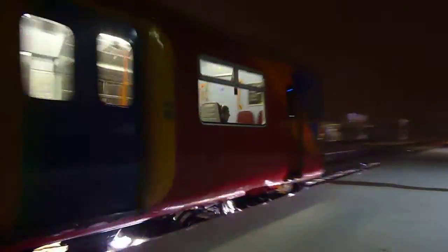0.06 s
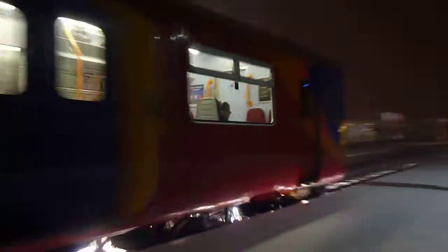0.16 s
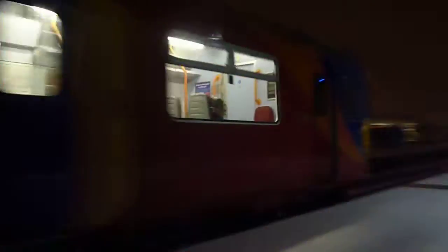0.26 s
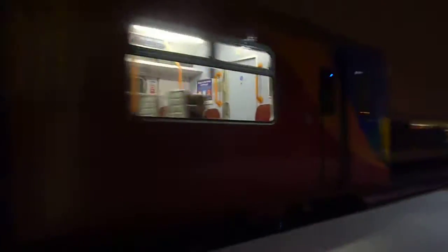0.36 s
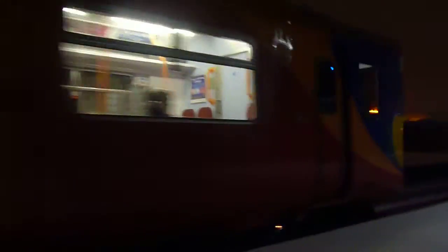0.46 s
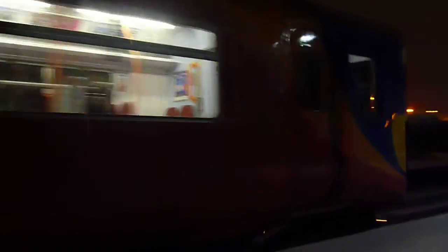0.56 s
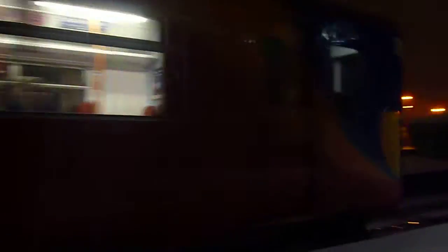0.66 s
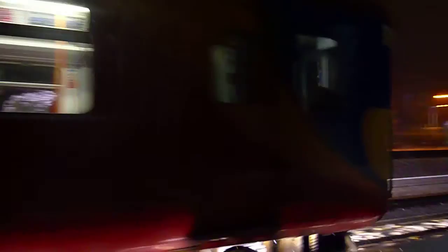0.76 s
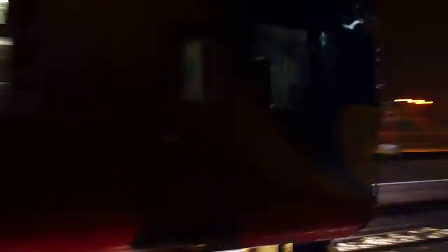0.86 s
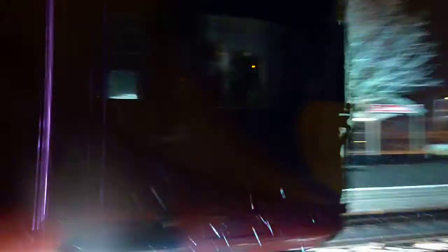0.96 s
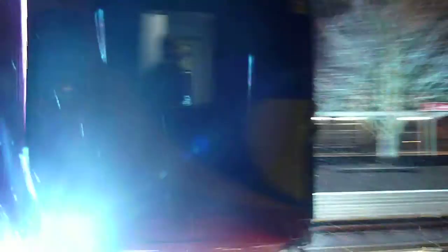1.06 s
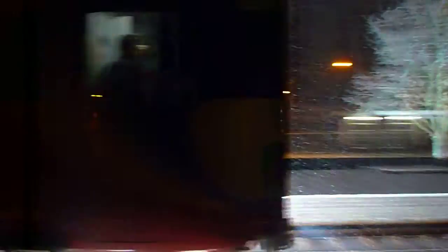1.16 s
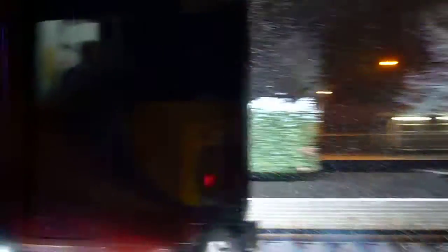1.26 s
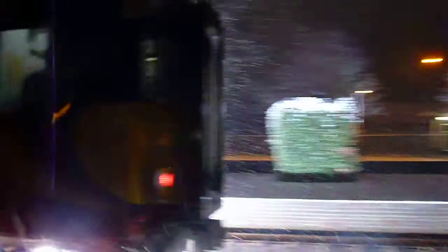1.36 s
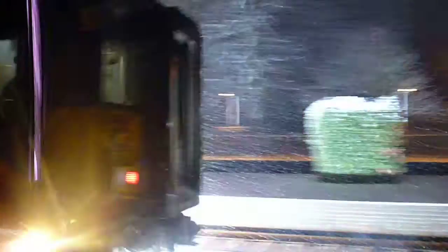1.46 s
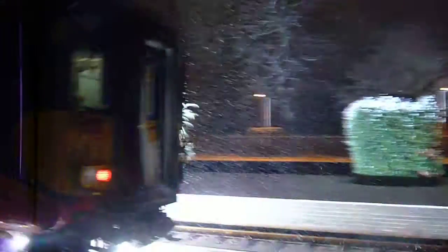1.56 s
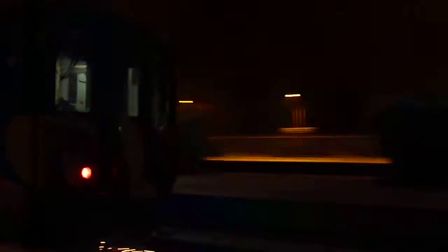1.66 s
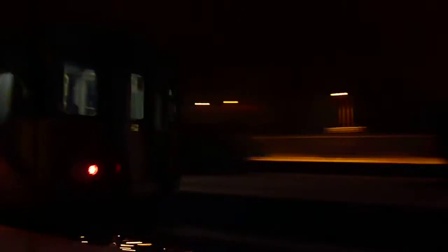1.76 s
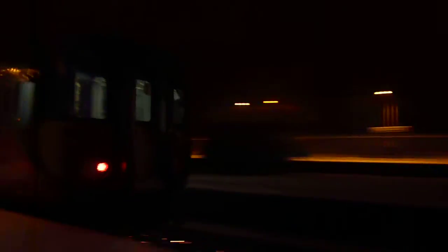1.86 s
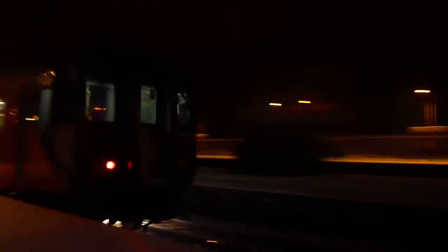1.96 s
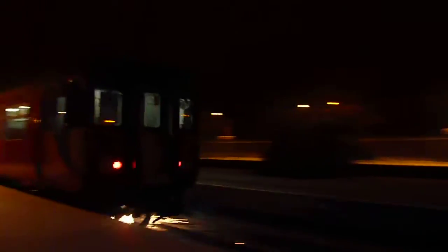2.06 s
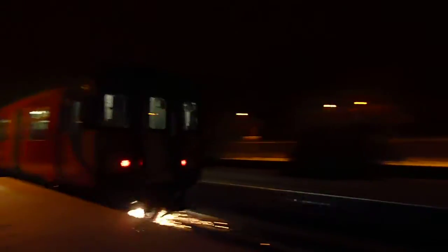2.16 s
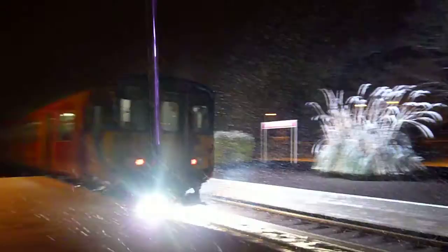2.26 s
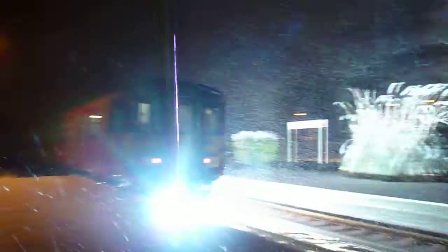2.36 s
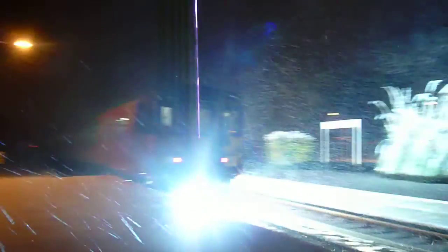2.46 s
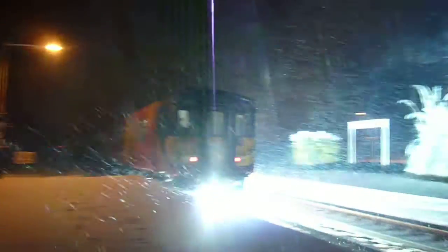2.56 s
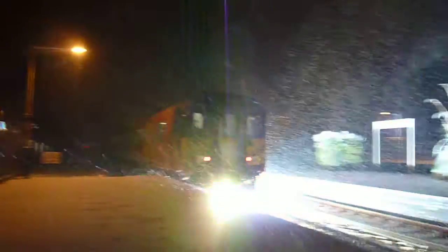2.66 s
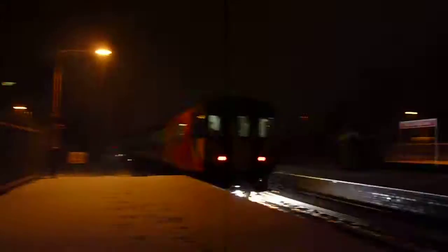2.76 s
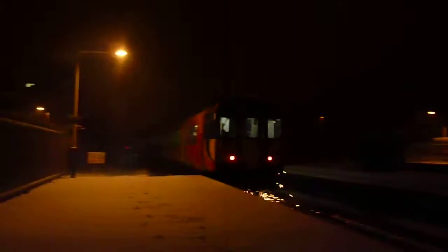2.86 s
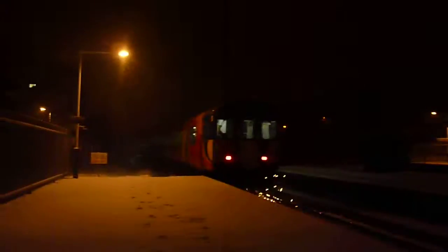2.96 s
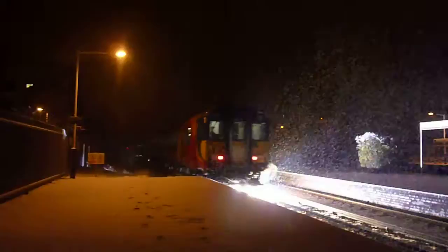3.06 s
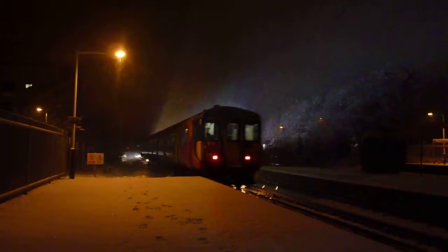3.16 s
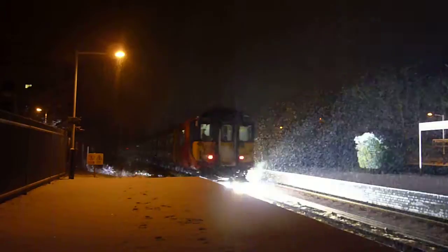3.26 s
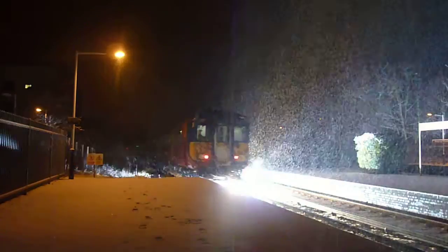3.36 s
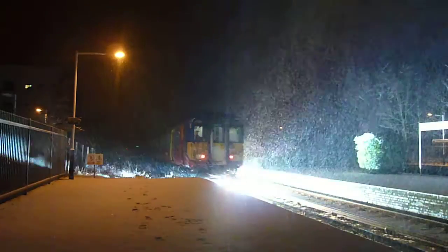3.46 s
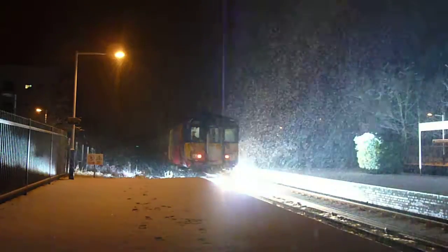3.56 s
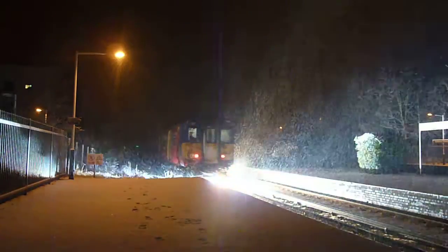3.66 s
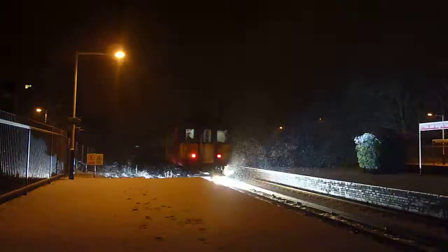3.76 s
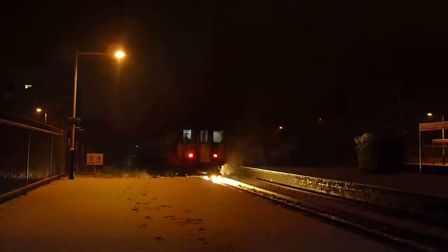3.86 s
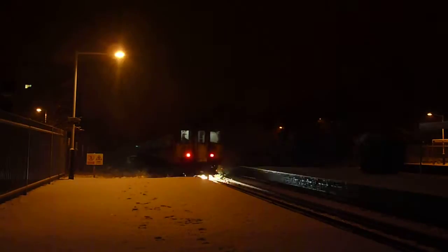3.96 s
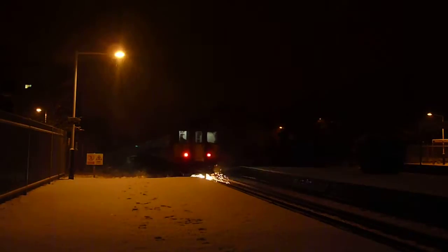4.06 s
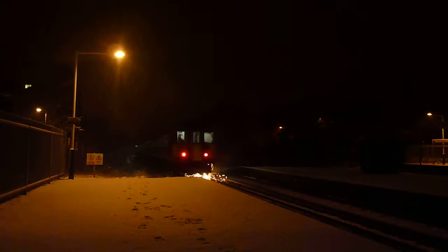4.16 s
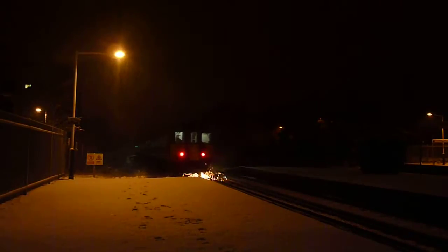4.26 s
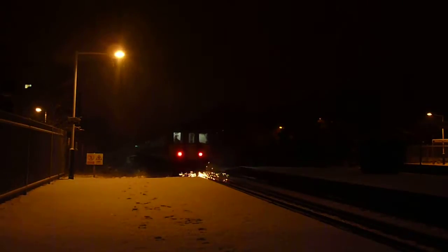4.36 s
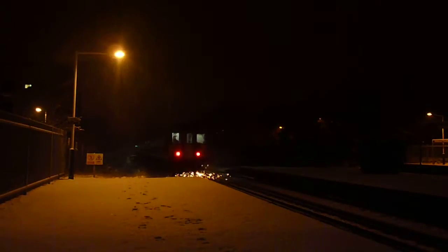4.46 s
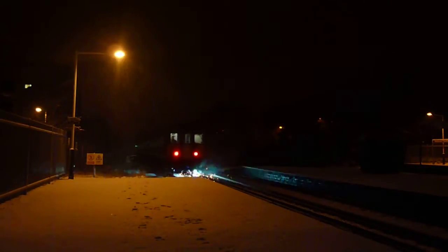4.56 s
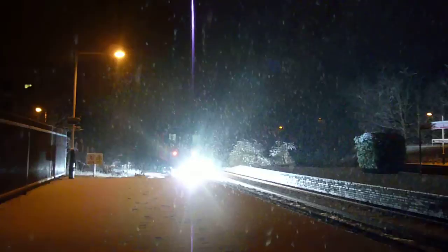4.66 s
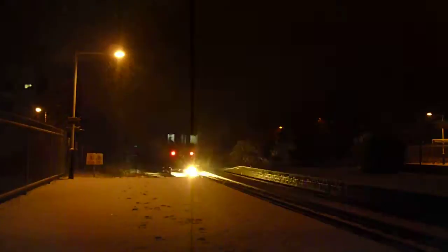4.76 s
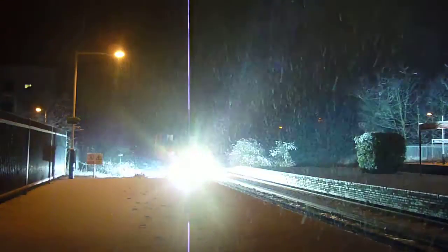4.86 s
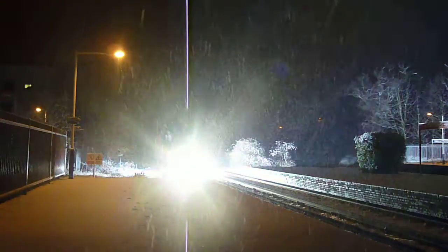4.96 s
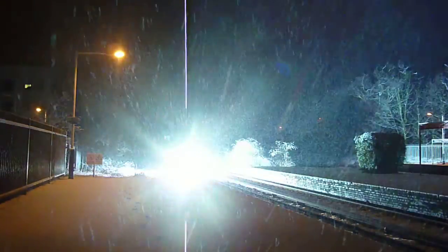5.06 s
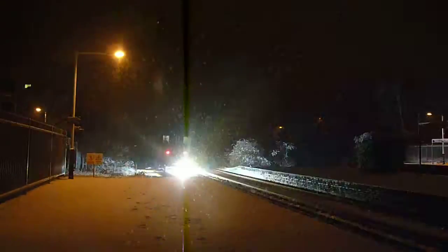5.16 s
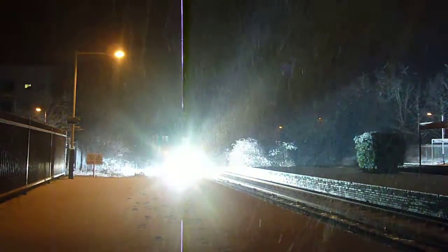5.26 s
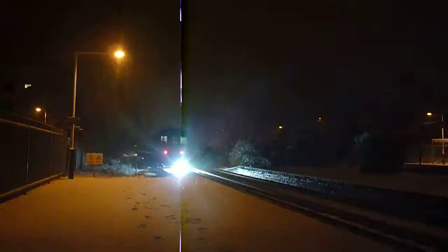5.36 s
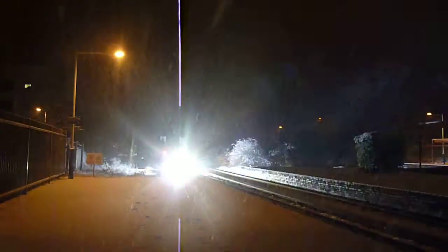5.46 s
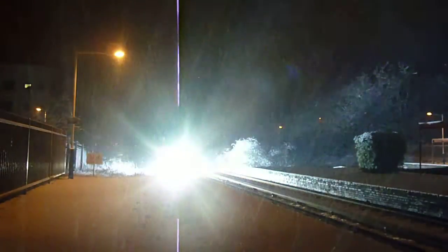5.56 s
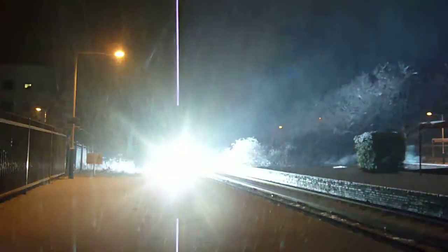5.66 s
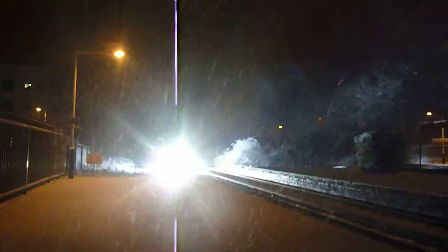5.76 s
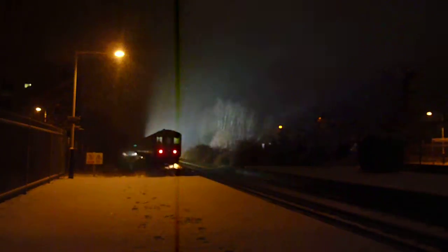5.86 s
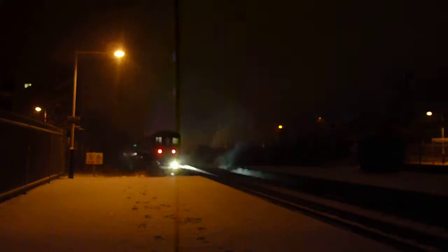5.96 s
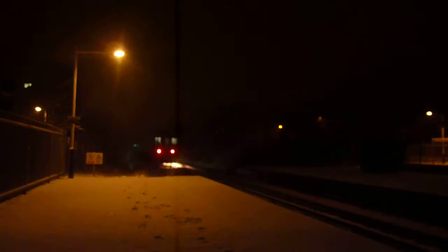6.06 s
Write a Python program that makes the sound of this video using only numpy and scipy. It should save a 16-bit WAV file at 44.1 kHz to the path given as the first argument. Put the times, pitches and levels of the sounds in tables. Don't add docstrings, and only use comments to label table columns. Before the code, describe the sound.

A train rolls away with a low, patchy rumble and wheel hiss throughout, quieter than the arcs. At 0 to 0.2 s brief arcs spit and crackle; from 0.3 to 0.7 a rough hollow howl near 480 Hz moves under the car. A sharp double burst and heavy knock come at 0.71 to 0.8, then a fierce buzzing arc passes closest at 0.85 to 1.3, surging again until 1.65. After a lull, snaps and a weak burst fill 1.94 to 2.1; a long ringing, crackling roar holds from 2.2 to 2.77. Mostly rolling follows, then a hard strike at 3.11, a duller booming arc from 3.33 to 3.83, and another fading by 4.2. Faint knocks and rolling lead to a violent crack at 4.76. From 4.88 far, thin arcs fizz and restrike near 5.3 and 5.6, ending about 6.09. Short outdoor echoes, small microphone, limited treble.

```python
import sys
import numpy as np
from scipy import signal
from scipy.io import wavfile
from scipy.ndimage import uniform_filter1d

SR = 44100
rng = np.random.default_rng(int(sys.argv[2]) if len(sys.argv) > 2 else 0)


def invert_db(x):
    u = np.asarray(x, float) / 20
    return 10 ** u


def unload_wav(signal):
    wavfile.write(
        sys.argv[1],
        SR,
        np.round(np.clip(np.atleast_2d(signal).T, -1, 1) * 32767).astype(np.int16),
    )


N = 268715


def evened(x):
    return x / np.sqrt(np.mean(x ** 2) + 1e-20)


def read(points, hz):
    f, value = np.transpose(points)
    return np.interp(np.log(hz + 1), np.log(f + 1), value)


def add(mix, s, sound):
    part = mix[round(s * SR):][:len(sound)]
    part += sound[:len(part)]


def colour(x, points):
    db = read(points, abs(np.fft.fftfreq(8192, 1 / SR)))
    log_gain = np.log(invert_db(np.maximum(db, -100)))
    taps = np.fft.ifft(np.exp(np.conj(signal.hilbert(log_gain)))).real[:4096]
    return signal.oaconvolve(x, taps)[:len(x)]


def band(x, lo_hz, hi_hz, order=3):
    sos = signal.butter(order, [lo_hz, hi_hz], "band", fs=SR, output="sos")
    return evened(signal.sosfilt(sos, x))


def resonate(x, hz, width):
    r = np.exp(-np.pi * width / SR)
    return evened(signal.lfilter([1], [1, -2 * r * np.cos(2 * np.pi * hz / SR), r * r], x))


def flicker(seconds):
    size = round(seconds * SR)
    smooth = uniform_filter1d(uniform_filter1d(rng.standard_normal(N), size), size)
    return np.clip(evened(smooth), -2, 2)


def sparks(per_s, spread_db, hiss):
    size = invert_db(spread_db * np.minimum(rng.exponential(1, N), 5)) * rng.choice([-1., 1.], N)
    return evened(size * (rng.random(N) < per_s / SR)) + hiss * rng.standard_normal(N)


def mottled(x, patchy_db):
    z = signal.stft(x, nperseg=1024, noverlap=768)[2]
    patches = uniform_filter1d(rng.standard_normal(z.shape), size=4, axis=0)
    patches = uniform_filter1d(patches, size=7, axis=1)
    patches = evened(uniform_filter1d(patches, size=3, axis=0))
    return signal.istft(z * invert_db(patchy_db * patches), nperseg=1024, noverlap=768)[1][:N]


# frequency in Hz, reverberation time T60 in seconds.
RETURN_DECAY = [(100, 0.7), (1000, 0.71), (3000, 0.48), (7000, 0.44)]


def surrounds(x):
    taps = np.zeros(SR)
    at = np.arange(400, SR - 20, 20)
    taps[at + rng.integers(0, 20, len(at))] = rng.choice([-1., 1.], len(at))
    hz, t, z = signal.stft(taps, SR, nperseg=256)
    decay = invert_db(-60 * t / read(RETURN_DECAY, hz)[:, None])
    tail = signal.istft(z * decay, SR, nperseg=256)[1]
    return signal.fftconvolve(x, tail / np.linalg.norm(tail))[:N]


# time in seconds, level in dB, brightness in dB.
ROLLING_LEVEL = [(0, -34, 2.5), (.26, -38, 5), (.45, -31, -1), (.68, -31.5, -6.5), (.83, -46, 9.5),
                 (1.3, -36, 4.5), (1.69, -38, 1.5), (1.92, -33.5, -6), (2.14, -39.5, 2), (2.8, -38, 3.5),
                 (3.09, -35.5, -3.5), (3.27, -43.5, 11.5), (3.84, -37, 3.5), (4.3, -38.5, -1.5),
                 (4.46, -40.5, -7), (4.6, -39, -12), (4.731, -40, -6), (6.09, -33.5, -0.5)]
# frequency in Hz, density in dB per Hz.
ROLLING_COLOUR = [(15, -29.5), (25, -13), (180, -8.5), (368, -14.5), (456, -4.5), (579, -5.5),
                  (1430, -14.5), (4490, -22.5), (7400, -36.5), (9620, -88.5), (16300, -120)]
HISS_DB, TOP_DB, TOP_PER_BRIGHT = -0.9, -14, 1.66
RUMBLE_DB, RUMBLE_PER_LEVEL, RUMBLE_SPREAD = 5, 0.43, 0.54
BOGIE_PASSES_S, TRACK_M, SPEED_M_S = 0.71, 5.4, 6.4


def rolling():
    s, *columns = np.transpose(ROLLING_LEVEL)
    t = np.arange(N) / SR
    body_db, bright_db = (np.interp(t, s, c) for c in columns)
    hiss_db = body_db + HISS_DB + bright_db
    top_db = body_db + TOP_DB + TOP_PER_BRIGHT * bright_db
    rumble_db = body_db[0] + RUMBLE_PER_LEVEL * (body_db - body_db[0]) + RUMBLE_DB
    along = SPEED_M_S * (t - BOGIE_PASSES_S) / TRACK_M
    rumble_db -= RUMBLE_SPREAD * 10 * np.log10(1 + along ** 2)

    x = mottled(sparks(per_s=5000, spread_db=0.0, hiss=1.2), patchy_db=2.1)
    x = colour(x, ROLLING_COLOUR)
    body = band(x, 620, 2550, order=2) * invert_db(body_db + 0.58 * flicker(0.064))
    hiss = band(x, 2050, 3870, order=1) * invert_db(hiss_db)
    hiss += band(x, 3160, 6800, order=2) * invert_db(top_db)
    hiss *= invert_db(flicker(0.045))
    rumble = band(x, 30, 643) * invert_db(rumble_db + 0.66 * flicker(0.067))
    rails = band(x, 540, 880, order=2) * invert_db(-45.5)
    return body + hiss + rumble + rails


# start in seconds, peak level in dB, ring in Hz, decay time T60 in seconds.
WHEEL_KNOCKS = [(0.311, -28.5, 186, 0.0095), (3.735, -24.5, 102, 0.08), (0.769, -6, 934, 0.033),
                (0.792, -12, 153, 0.041), (1.274, -10.5, 281, 0.054), (1.343, -18, 261, 0.025),
                (1.377, -24, 220, 0.043), (2.1765, -12, 585, 0.013), (2.293, -11.5, 150, 0.029),
                (3.318, -14, 414, 0.02), (4.379, -29, 762, 0.023), (4.455, -31, 678, 0.017),
                (4.545, -29, 750, .03), (4.584, -27, 805, .02), (4.604, -27, 584, 0.026),
                (4.477, -9.5, 237, 0.0055), (4.7545, -15.5, 215, 0.06)]


def knocks():
    out, t = np.zeros(N), np.arange(3000) / SR
    for s, db, hz, t60 in WHEEL_KNOCKS:
        envelope = invert_db(db + 0.5 - 60 * t / t60) * np.minimum(t / .0015, 1)
        add(out, s, envelope * np.sin(2 * np.pi * hz * t))
    return out


# time in seconds, level in dB, howl in Hz.
HIDDEN_HOWL = [
    (.3, -30, 486),
    (.338, -33, 450),
    (.376, -37, 448),
    (.456, -30, 490),
    (.604, -31, 474),
    (.638, -34, 477),
    (.67, -32, 547),
    (.72, -32.5, 490),
]
DRONE_DB, DRONE_DB_PER_S = -7.5, 23


def hidden_arc():
    s, *columns = np.transpose(HIDDEN_HOWL)
    t = np.arange(s[0], s[-1], 1 / SR)
    howl_db, hz = (np.interp(t, s, c) for c in columns)
    drone_db = howl_db + DRONE_DB + DRONE_DB_PER_S * (t - s[0])
    drive = sparks(per_s=820, spread_db=2.5, hiss=0.5)[:len(t)]
    turn = np.exp(2j * np.pi * np.cumsum(hz) / SR)
    r = np.exp(-np.pi * 220 / SR)
    ring = turn * signal.lfilter([1], [1, -2 * r, r * r], drive / turn)
    howl = invert_db(howl_db) * evened(ring.real + .002 * drive)
    drone = invert_db(drone_db) * resonate(drive, hz=210, width=33)
    out = np.zeros(N)
    add(out, s[0], (howl + drone) * signal.windows.tukey(len(t), .04))
    return out


# middle in
# seconds, peak level in dB, ring in Hz, length in ms.
HOLLOW_POPS = [(0.006, -22.5, 1278, 7.7), (0.0155, -24, 3531, 15), (0.097, -30, 1350, 15.0),
               (0.1093, -27.5, 5254, 9.0), (0.1127, -26, 4810, 16), (0.7206, -25, 2710, 6.7),
               (0.534, -28, 490, 20), (0.7772, -27.5, 2060, 14.0), (0.8518, -20, 1135, 8.9),
               (0.876, -16, 174.4, 15.0), (1.013, -26.5, 856, 15), (1.08, -26, 877, 19),
               (1.207, -23, 1470, 10), (1.3443, -13.5, 212, 6.0), (1.384, -21.5, 290, 20),
               (2.299, -17.5, 1317, 4.6), (2.307, -24, 3840, 10), (2.312, -26, 1824, 6.0),
               (2.32, -23, 4080, 8.0), (2.3382, -17, 2840, 7.0), (2.3846, -26, 2905, 8.8),
               (2.5158, -23.5, 1090, 26.0), (2.5535, -26, 2650, 11), (2.377, -26, 453, 20),
               (2.6936, -23, 1870, 7.8), (2.7238, -26, 2860, 8), (3.402, -28.5, 2142, 16),
               (3.1498, -24, 3660, 14.0), (3.153, -22, 3224, 18), (3.1885, -25, 1498, 11),
               (3.331, -28, 1513, 6.6), (3.342, -25, 2246, 22), (3.3332, -25, 4060, 14),
               (3.342, -21, 2900, 12.0), (3.3539, -27, 3550, 8.1), (3.6404, -24, 2970, 5.7),
               (3.65, -26.5, 1033, 30), (3.6617, -20.5, 2980, 5.7), (3.6921, -17, 3360, 5.0),
               (3.7885, -23, 1610, 5), (3.8795, -23, 1410, 9.0), (3.8835, -20, 3100, 4.0),
               (4.7629, -11, 3130, 2.7), (4.757, -16.5, 3050, 2.5), (4.7688, -26, 4540, 5.7),
               (4.85, -24.5, 2820, 12.0), (4.9138, -26, 3630, 10), (4.9143, -23.5, 2910, 15),
               (5.631, -19, 3359, 3.9), (5.902, -25, 196, 26),
               (0.009, -26, 520, 11), (0.135, -24, 199, 25), (0.382, -25.5, 355, 42),
                 (0.385, -26, 457, 40), (0.478, -23.5, 498, 28), (0.865, -24, 150.5, 30),
                 (0.952, -20.5, 190, 10.8), (0.655, -27, 213, 50), (0.988, -19, 443, 9),
                 (1.005, -19, 1022, 11.1), (1.037, -26, 470, 10), (1.068, -24, 559, 24),
                 (1.1, -22, 191, 24), (5.372, -20.5, 239, 21.5), (3.55, -27.5, 95.4, 40),
                 (1.155, -22, 172, 12.7), (5.268, -29, 90.5, 25), (3.521, -28, 1440, 20),
                 (1.397, -27, 518, 19.5), (1.514, -24, 1265, 10), (1.539, -26, 1647, 14),
                 (2.307, -28, 455, 34), (2.487, -30.5, 438, 21), (2.587, -23, 191, 15),
                 (3.123, -24.5, 1460, 17), (3.124, -27.5, 1050, 11.4), (3.49, -22, 224, 35),
                 (3.575, -20, 231.3, 60), (3.61, -30, 1480, 40), (4.934, -21, 213, 12.2),
                 (5.79, -27, 234, 17)]


def pops():
    events = HOLLOW_POPS
    out, rough = np.zeros(N), rng.standard_normal((len(events), 6000))
    for (s, db, hz, ms), noise in zip(events, rough):
        t = np.arange(min(round(2 * ms * SR / 1000), 6000)) / SR
        wobble = 1 + 0.3 * evened(uniform_filter1d(noise, size=60))[:len(t)]
        tone = np.hanning(len(t)) * wobble * np.sin(2 * np.pi * hz * t)
        add(out, max(s - ms / 1000, 0), invert_db(db) * tone)
    return out


# peak time in seconds, peak level in dB, ring in Hz.
ICE_SNAPS = [(0.114, -6.5, 3830), (0.724, -11, 4310), (0.7437, -11, 4440), (0.7734, -10, 1130),
             (0.8495, -5, 900), (1.1934, -15, 2670), (1.2021, -8.5, 1890), (1.5644, -12, 3880),
             (1.5749, -7, 4500), (1.6037, -12, 2330), (1.953, -9.5, 2300), (2.0339, -16, 2800),
             (2.0489, -12, 2370), (2.0917, -18.5, 4010), (2.2109, -13, 3530), (2.2452, -21.5, 2840),
             (2.2813, -7, 3250), (2.3013, -10, 4220), (2.3089, -5.5, 2890), (2.3365, -9, 2630),
             (2.3418, -7, 2630), (2.3875, -9.5, 2710), (2.487, -12.5, 1290), (2.5236, -14, 2540),
             (2.5649, -8, 1890), (2.5941, -18, 3270), (2.6072, -19, 2540), (2.6732, -10.5, 2970),
             (2.7239, -14, 2920), (2.8175, -15, 3960), (3.1168, -6.5, 1550), (3.1265, -6.5, 1290),
             (3.1499, -6, 3190), (3.1832, -13, 3060), (3.1918, -13, 3530), (3.3306, -10, 3660),
             (3.3379, -12, 2870), (3.3539, -8, 3770), (3.3932, -12, 2500), (3.4053, -13, 2000),
             (3.4295, -14, 3880), (3.4449, -9, 1810), (3.6266, -9, 3100), (3.692, -7, 3270),
             (3.7597, -9, 3160), (3.7904, -7.5, 3530), (3.855, -7.5, 2330), (3.8831, -16, 3010),
             (4.6771, -19, 3450), (4.7624, -7, 3100), (4.7668, -12.5, 2710), (4.7988, -12.5, 3140),
             (4.8364, -12.5, 2970), (4.8466, -13, 3010), (5.1442, -14.5, 4910), (5.3161, -8, 3230),
             (5.5327, -6, 3530), (5.7175, -7, 2920)]
SNAP_DB, SNAP_RISE_MS, SNAP_FALL_MS = -1.5, .25, 0.31


def snaps():
    out, ms = np.zeros(N), np.arange(-88, 400) / SR * 1000
    shape = np.where(ms < 0, np.exp(ms / SNAP_RISE_MS), np.exp(-ms / SNAP_FALL_MS))
    for k, (s, db, hz) in enumerate(ICE_SNAPS):
        sign = (-1) ** k
        add(out, s - .002, sign * invert_db(db + SNAP_DB) * shape * np.cos(2 * np.pi * hz * ms / 1000))
    return out


# start in seconds, peak level in dB, centre in Hz, length in ms.
CURRENT_FLARES = [(0.187, -20, 3680, 3.2), (0.714, -11.5, 4380, 29), (0.8468, -11.5, 4470, 11),
                  (1.144, -6, 2920, 4.5), (1.1812, -17, 2480, 7.4), (1.231, -26, 4000, 2.7),
                  (1.3457, -11, 2530, 4.4), (1.563, -8.5, 3830, 11), (1.6062, -24, 2480, 5.7),
                  (1.9378, -20, 3580, 2.3), (1.9516, -6, 3000, 3.6), (2.0488, -4.5, 2670, 2.8),
                  (2.0928, -4.5, 3430, 1.3), (2.267, -9.5, 3720, 4.1), (2.2969, -7.5, 2900, 6.1),
                  (2.3083, -6, 2760, 2.4), (2.374, -17, 2810, 6.4), (3.115, -19, 2850, 12),
                  (3.1313, -16, 3300, 1.5), (3.1495, -26, 2910, 6.9), (3.183, -8, 3240, 1.8),
                  (3.661, -10, 3150, 2.5), (3.6878, -18, 3430, 1.7), (3.755, -9, 3200, 8.4),
                  (3.8525, -14, 3400, 3), (4.678, -21, 4200, 2.4), (4.7562, -10, 3100, 4.1),
                  (4.765, -4.5, 3200, 7.9), (4.82, -20, 2910, 4), (5.613, -16, 3400, 1.9)]
PUSH_DB, PUSH_DB_PER_S = -4, -4


def flares():
    out, t = np.zeros(N), np.arange(2000) / SR
    noise = rng.standard_normal((len(CURRENT_FLARES), len(t)))
    u = t / 0.0002
    pulse = u * (2 - u) * np.exp(-u) * 2
    for (s, db, hz, ms), n in zip(CURRENT_FLARES, noise):
        shape = np.minimum(t / 0.00016, 1) * np.exp(-t * 1000 / ms)
        crack = evened(resonate(n, hz, width=0.093 * hz) + .5 * band(n, 730, 4700)) * shape
        push = invert_db(PUSH_DB + PUSH_DB_PER_S * s) * pulse
        add(out, s - .001, invert_db(db - 11.5) * (crack + push))
    return out


# frequency in Hz, width in Hz, level in dB.
PLACE_HOLLOWS = [
    [(559, 54, 14.5), (1373, 46, 7), (4500, 270, -18.5)],
    [(488, 58, 15), (966, 220, 4), (1410, 120, -13.5), (2840, 240, -9), (4380, 300, -21.5)],
    [(333, 30, 0.5), (1170, 68, -3), (1640, 95, -7), (2500, 370, -7), (3550, 220, -18.5)],
    [(1930, 300, -3), (3400, 100, -8)],
    [(442, 82, 3.5), (1050, 67, 2), (1506, 36, -4.5), (1900, 200, -17.5), (2850, 390, -18),
     (3360, 110, -22.5)],
    [(1060, 23, -24), (1453, 67, 6), (1970, 19, -9), (2910, 300, 0), (3230, 450, -4.5)],
    [(700, 120, -2), (1050, 130, 4.5), (1556, 47, 7.5), (1890, 200, -8), (3100, 600, -7),
     (3500, 250, -10.5)],
    [(1360, 120, -0.5), (1940, 250, -7)],
    [(2920, 180, -4), (3200, 280, -10), (3530, 37, -10), (4250, 86, -35)],
    [(720, 240, -15), (1085, 42, 14), (2910, 810, 6)],
]
WAVER_DB, WAVER_S = 3, .02


def hollow_rings(drive, wide, place, waver):
    rings = 0
    for k, (hz, width, db) in enumerate(PLACE_HOLLOWS[place]):
        broad = width + 0.039 * hz
        ring = resonate(resonate(drive[wide], hz, broad), hz, broad)
        rings = rings + invert_db(db) * np.sqrt(width) * ring * waver[wide - k * SR // 5]
    return evened(rings)


# frequency in Hz, density in dB per Hz.
BARE_ARC_COLOUR = [(15, -38), (25, -8), (86, -1), (129, -1.5), (223, 1.5), (305, -12.5), (435, -8),
                   (514, -7), (1050, -8.5), (1240, -7), (1470, -10), (2050, -15), (2920, -13.5),
                   (5300, -17), (7400, -31.5), (9620, -47), (16300, -120)]
# time in seconds, current in dB, stretch in dB.
FAINT_ARCS = [
    [(0.0, -32, 14), (0.014, -33.5, 4), (0.026, -32, 6.5), (0.062, -40, -2)],
    [(2.81, -46, -14), (2.82, -34, -26), (2.85, -43, -1)],
    [(4.668, -40.5, 7), (4.674, -35, 3), (4.678, -34, -21), (4.69, -51, -2)],
]
# time in seconds, current in dB, stretch in dB.
BROKEN_ARCS = [
    [(0.075, -44, -2.5), (0.085, -30.5, 3.5), (0.177, -31, 0), (0.183, -26.5, 1), (0.199, -31, 5),
     (0.225, -37, 4)],
    [(0.713, -26, 6), (0.717, -27.5, -9.5), (0.765, -29, -21), (0.773, -22, -10.5), (0.801, -29.5, 5),
     (0.815, -45, 2)],
    [(1.936, -30.5, 8), (1.952, -32.5, -1.5), (1.966, -35.5, -20.5), (2.056, -30, 4.5), (2.098, -32, -12),
     (2.105, -50, -3)],
    [(3.112, -21.5, 3), (3.15, -26, -24), (3.176, -27, -7.5), (3.184, -27.5, -4.5), (3.215, -32, -21)],
    [(4.754, -31, 6.5), (4.764, -21, -9), (4.776, -30.5, -6.5), (4.818, -27, -4.5), (4.852, -28, -36.5),
     (4.862, -37, -13)],
]
# time in seconds, current in dB, stretch in dB.
NEAR_ARCS = [
    [(0.845, -26, 7), (0.847, -27.5, -1.5), (1.077, -28.5, -3.5), (1.143, -29.5, 4), (1.195, -25.5, -9),
     (1.223, -35, 10.5), (1.239, -25, 0), (1.277, -30, -6.5), (1.292, -36, 8)],
    [(1.3, -41.5, 5), (1.36, -27, 1), (1.38, -33.5, 10.5), (1.452, -33, 4), (1.528, -22.5, -10),
     (1.588, -38.5, 14), (1.602, -27, -8), (1.646, -36, 5), (1.665, -58, 10)],
    [(2.2, -30, -9.5), (2.21, -32, -28), (2.262, -33, -0.5), (2.3, -23.5, -7), (2.342, -28.5, -25),
     (2.352, -27, -9.5), (2.562, -27.5, -1.5), (2.74, -28, -10.5), (2.77, -44, -26.5)],
]
# time in seconds, current in dB, stretch in dB.
LEAVING_ARCS = [
    [(3.325, -20.5, -6), (3.331, -24.5, -9), (3.431, -27, -9.5), (3.457, -29, -2.5), (3.567, -28, -3),
     (3.711, -25, -6.5), (3.739, -32, 9), (3.795, -23.5, -7), (3.835, -42, -9)],
    [(3.844, -31, -10), (3.854, -21.5, -10), (3.94, -33, 1.5), (3.984, -31.5, -4), (4.03, -35, -16),
     (4.106, -40, -11), (4.136, -40.5, -8), (4.16, -45, -13), (4.2, -61, -11)],
]
# time in seconds, current in dB, stretch in dB.
FAR_ARCS = [
    [(4.884, -37, 8.5), (4.906, -25, -12), (5.006, -31, 7), (5.038, -30, -1), (5.19, -27, -7.5),
     (5.206, -30.5, 2), (5.256, -28, -6.5), (5.288, -33, 0), (5.299, -31, -6)],
    [(5.297, -32, 1), (5.311, -25, 2), (5.333, -28, -5), (5.363, -29.5, 5), (5.405, -26, -1),
     (5.473, -35, -2.5), (5.525, -24, -0.5), (5.581, -33, 0), (5.59, -35, -9)],
    [(5.588, -32, -2), (5.628, -26.5, 0.5), (5.682, -30, 6), (5.758, -30.5, -7), (5.772, -32.5, 0),
     (5.944, -29, 0.5), (5.994, -35.5, -25), (6.014, -30, -1.5), (6.093, -45, -7)],
]
PLACE_STARTS = [0, .6, 1.296, 1.8, 2.15, 3.0, 3.27, 3.9, 4.4, 4.875]
# ringing of its hollows as a ratio 0-2, deep thunder as a ratio 0-1,
# pit boom as a ratio 0-2, spit in dB, body in dB.
PLACE_ACOUSTICS = [
    (0.58, 0.3, 0.24, 0, -2.5),
    (0.4, 0.11, 0.089, -8, 1),
    (0.29, 0.23, 0.12, -7, -1.5),
    (.18, 0.17, 0.16, -0.5, -1.5),
    (0.7, 0.3, 0.08, -8.5, -1.5),
    (0.97, 0.65, 0.41, -9, -1.5),
    (0.27, 0.19, 0.33, -11, -2.5),
    (0.22, 0.17, .5, -13, -2),
    (0.21, 0.17, 0.35, -7.5, -3),
    (0.07, 0.31, 0.46, -10, -4.5),
]
PIT_SHARE, PIT_MS = 0.14, 2.347
USUAL_DB = -27
SPIT_PER_CURRENT, SPIT_PER_STRETCH = 1.25, -0.21
BODY_PER_CURRENT, BODY_PER_STRETCH, DEEP_PER_STRETCH = 0.76, 0.31, 0.33
STRIKE_DB, STRIKE_S = 4, 0.028
THUMP_DB, THUMP_S = 4.5, 0.0022
CLOSEST_S, CLOSEST_DB, CLOSEST_WIDTH_S = 1.054, 3.5, 0.056


def arcs():
    drive = sparks(per_s=3200, spread_db=3.0, hiss=0.63)
    drive = drive * invert_db(0.7 * flicker(0.0025) + flicker(0.031))
    drive = mottled(drive, patchy_db=1.98)
    direct = colour(drive, BARE_ARC_COLOUR)
    back = np.roll(signal.lfilter([.45], [1, -.55], direct), round(PIT_MS * SR / 1000))
    lowest = resonate(drive, hz=220, width=76) * invert_db(2.4 * flicker(0.057))
    waver = invert_db(WAVER_DB * flicker(WAVER_S))
    out = np.zeros(N)
    for rows in FAINT_ARCS + BROKEN_ARCS + NEAR_ARCS + LEAVING_ARCS + FAR_ARCS:
        s, *columns = np.transpose(rows)
        place = np.searchsorted(PLACE_STARTS, s[-1]) - 1
        ringing, deep, boom, place_spit_db, place_body_db = PLACE_ACOUSTICS[place]
        at = np.arange(round(s[0] * SR), min(round(s[-1] * SR), N))
        t, age = at / SR, at / SR - s[0]

        fizz_db, stretch_db = (np.interp(t, s, c) for c in columns)
        over_db = fizz_db - USUAL_DB
        thump_db = THUMP_DB * np.exp(-age / THUMP_S)
        spit_db = USUAL_DB + place_spit_db + SPIT_PER_CURRENT * over_db + SPIT_PER_STRETCH * stretch_db
        spit_db += STRIKE_DB * np.exp(-age / STRIKE_S)
        body_db = USUAL_DB + place_body_db + BODY_PER_CURRENT * over_db + BODY_PER_STRETCH * stretch_db
        body_db += thump_db + CLOSEST_DB * np.exp(-((t - CLOSEST_S) / CLOSEST_WIDTH_S) ** 2)
        roar_db = fizz_db + stretch_db + thump_db
        deep_db = fizz_db + DEEP_PER_STRETCH * stretch_db + thump_db

        wide, tail = np.arange(max(at[0] - 2000, 0), at[-1] + 1), -len(at)
        x = evened(direct[wide] - PIT_SHARE * back[wide])
        x = x + ringing * hollow_rings(drive, wide, place, waver)
        sound = invert_db(fizz_db) * band(x, 1640, 3760)[tail:]
        sound += invert_db(spit_db) * band(x, 4030, 8700)[tail:]
        sound += invert_db(body_db) * band(x, 353, 1675)[tail:]
        sound += invert_db(roar_db) * evened(band(x, 126.0, 374)[tail:] + boom * lowest[at])
        sound += invert_db(deep_db) * deep * band(x, 11, 130)[tail:]
        edge = np.minimum(np.minimum(at - at[0], (at[-1] - at) / 4) / (0.002 * SR), 1)
        out[at] += sound * edge
    return out


def scene():
    far = rolling()
    near = knocks() + hidden_arc() + pops() + snaps() + flares() + arcs()
    return (near + invert_db(-9.5) * surrounds(near) + far)[None]


def low_pass(x):
    return signal.sosfilt(signal.butter(12, 9200, fs=SR, output="sos"), x)


CAPSULE_SR = 16000


def record(dry):
    x = signal.sosfilt(signal.butter(3, 42, "high", fs=SR, output="sos"), dry[0])
    x = signal.oaconvolve(x, signal.firwin(105, 7150, window=("kaiser", 8), fs=SR), "same")
    x = x * (1 + invert_db(0.56) * np.cos(2 * np.pi * CAPSULE_SR * np.arange(N) / SR))
    x = signal.oaconvolve(x, signal.firwin(125, 8350, window=("kaiser", 9), fs=SR), "same")
    return low_pass(x[None])


dry = scene()
out = record(dry)
unload_wav(out)
```